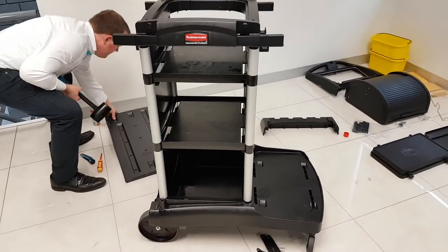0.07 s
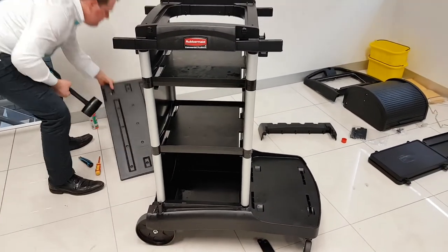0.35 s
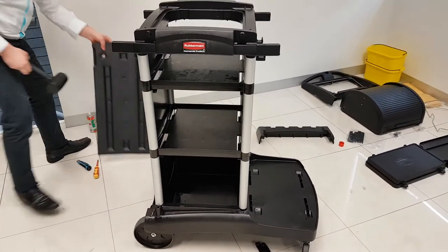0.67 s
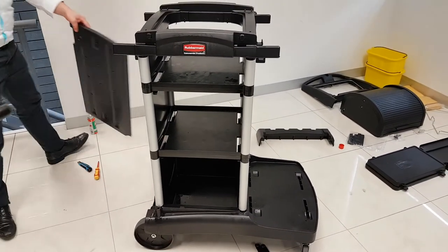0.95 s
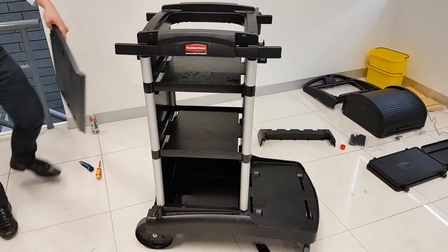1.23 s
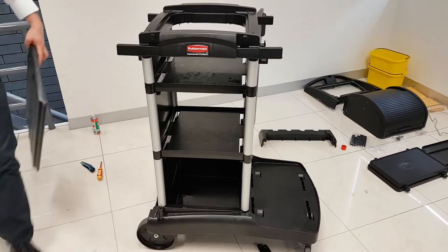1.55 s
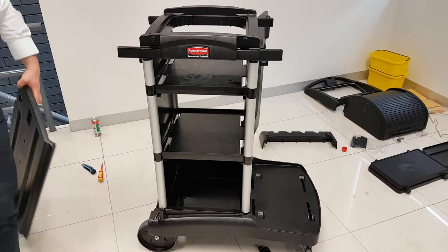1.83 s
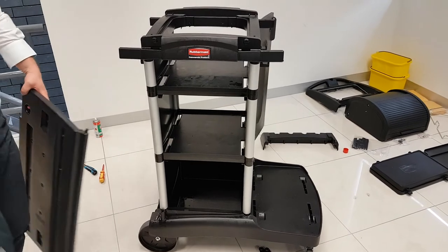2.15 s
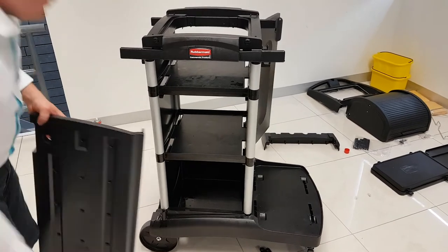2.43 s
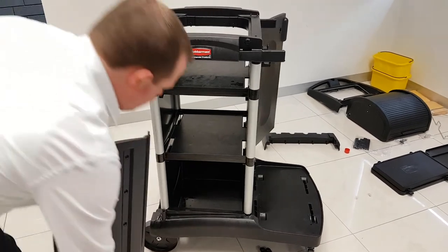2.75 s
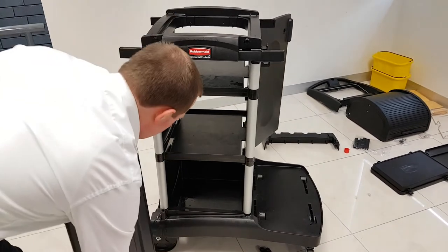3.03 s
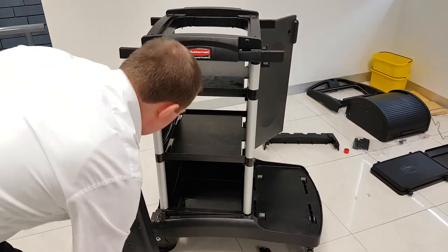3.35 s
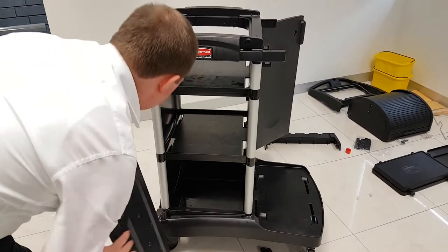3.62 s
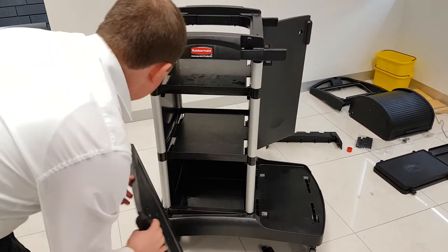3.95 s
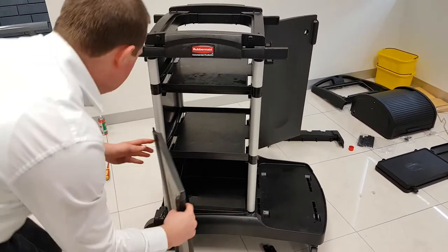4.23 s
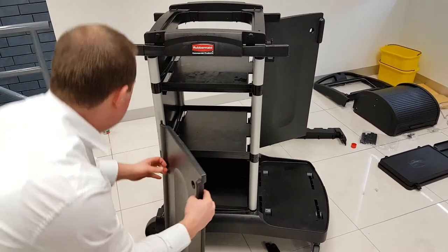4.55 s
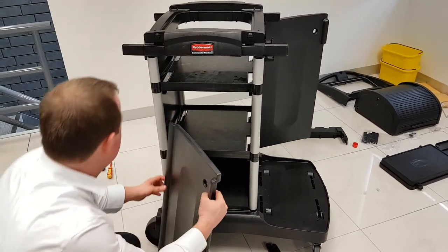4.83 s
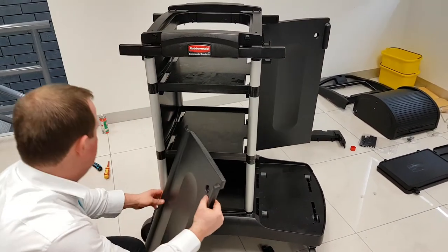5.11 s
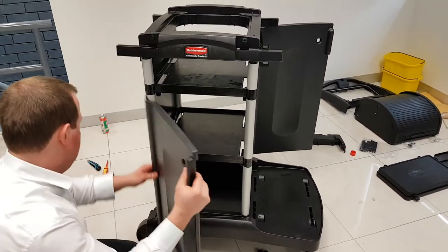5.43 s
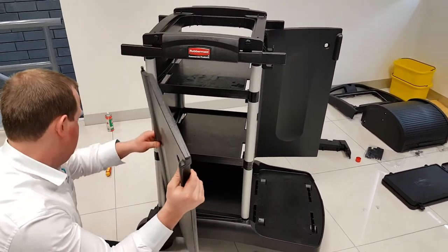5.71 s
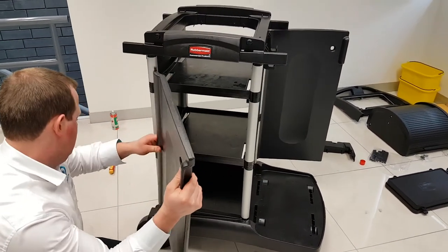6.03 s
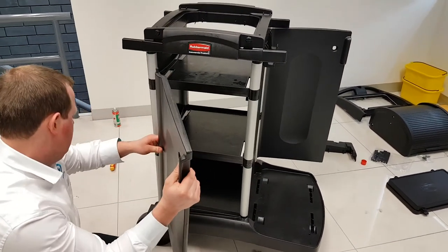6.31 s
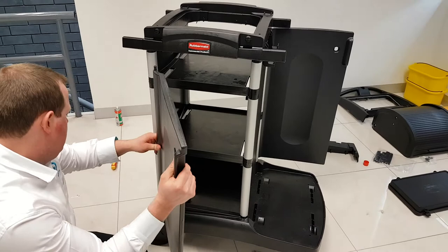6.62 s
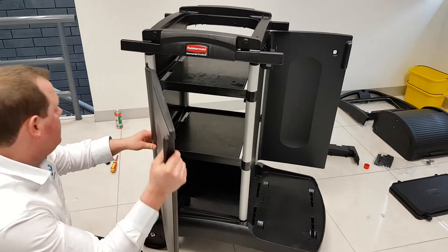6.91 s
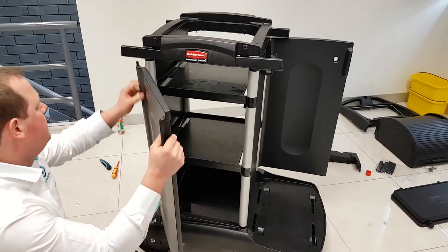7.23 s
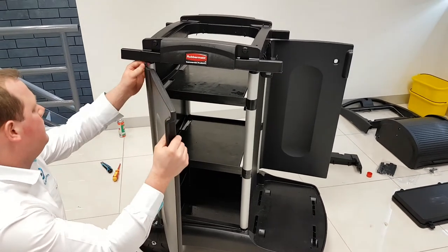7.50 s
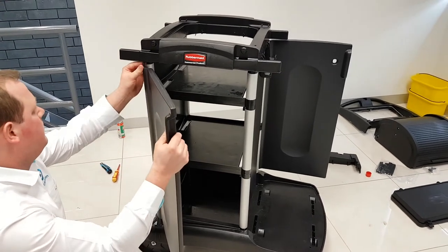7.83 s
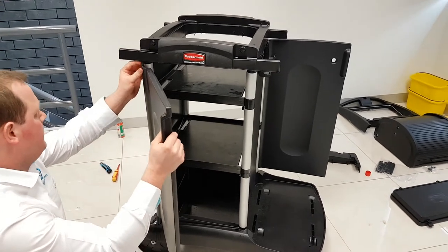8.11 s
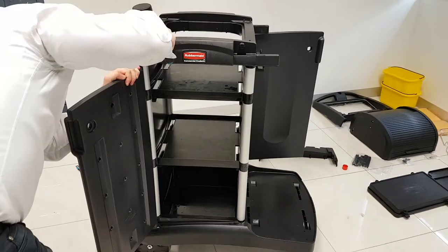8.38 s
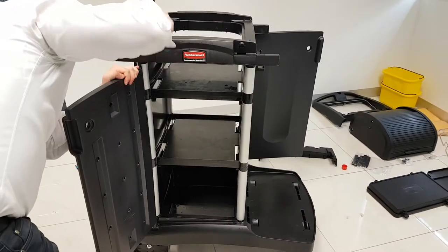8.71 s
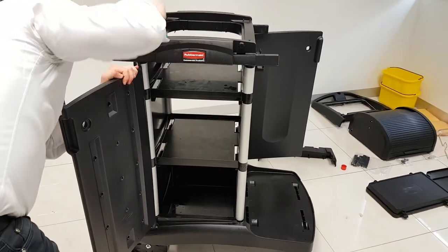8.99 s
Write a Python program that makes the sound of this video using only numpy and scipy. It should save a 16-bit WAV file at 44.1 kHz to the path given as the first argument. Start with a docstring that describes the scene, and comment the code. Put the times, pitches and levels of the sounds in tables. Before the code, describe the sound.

A plastic panel bumps on tiles, then knocks and booms against a hollow plastic cart, with a few footsteps in a bare room.

```python
"""A man lifts a plastic door panel off a tiled floor; it bumps, flexes and rings.
From 1 s his shoes tap and light clicks sound as he carries it round a plastic cart.
From 2.7 to 6.8 s he works it onto its hinge; it knocks on the hollow cart, which clacks and booms.
His hand slides up the door after 7 s; a shoe shifts on the tiles with a soft tap; a faint tick follows.
Throughout, the bare room answers briefly, ventilation hums and his shirt rustles faintly."""
import sys
import numpy as np
from scipy.fft import rfft, irfft, next_fast_len
from scipy.io import wavfile

SR = 44100
rng = np.random.default_rng(int(sys.argv[2]) if len(sys.argv) > 2 else 0)


def wrap_up_sound(samples):
    """Save the sound to the file named by the first command line argument, as 16-bit audio."""
    columns = np.atleast_2d(samples).T
    # keep every value between -1 and 1, then stretch to whole-number steps
    tamed = np.clip(columns, -1, 1)
    steps = np.round(tamed * 32767).astype(np.int16)
    wavfile.write(sys.argv[1], SR, steps)


N = 403515

# Three light clicks while the panel is carried, then door knocks on the cart. Each row: start in seconds,
# level in dB, contact time in ms, click in dB, bass weight in dB, frame ring in dB.
CLICKS_AND_KNOCKS = [(1.071, -53, 0.28, -6.5, -9, -1), (1.629, -64, 1.1, -1.5, 10, -2),
                     (1.925, -41.5, 0.24, -4.5, -1, -24), (2.744, -50.5, 1.25, -32, -10, -14),
                     (2.819, -43, 0.86, -15.5, -6, -14), (2.877, -27, 0.77, -21, 1, 9.5),
                     (2.912, -40, 0.64, -33, 5, 15.5), (2.955, -35.5, .95, -38, -1, 12),
                     (3.264, -41.5, 1.4, -24.5, 12, -9), (3.859, -24.5, 0.67, -21.5, 0.5, 10.5),
                     (4.013, -26.5, 1.42, -32, -6.5, -12), (4.411, -37, 0.94, -30, -9, 1),
                     (4.526, -45, 0.78, -21, -8, 0), (4.565, -27, 1.01, -34, -13, -7.5),
                     (4.851, -31, 0.89, -36, 4, 6.5), (4.979, -43, 1.15, -31, 1, -9),
                     (5.392, -26.5, 2.28, -59, -11, -11), (5.524, -24, 0.78, -38, -13.5, -20),
                     (5.612, -32.5, 0.93, -43, -11.5, -20), (5.656, -35.5, 1.4, -45, -17, -22),
                     (5.773, -22.5, 0.93, -24, -18.5, -9.5), (5.792, -26.5, 2.3, -36, -24, -15),
                     (5.859, -48, 1.4, -21, -13, -15), (6.756, -35, 0.94, -31, -12.5, -18),
                     (6.8, -38.5, 0.95, -19.5, -16, -22)]
# Cart frame. Each row: frequency in Hz, level in dB, t60 in seconds.
FRAME_MODES = [(63.6, -12, 0.68), (97, -17, 0.08), (147.8, 0, 0.31), (213.7, 1.5, 0.43), (274.7, -1, 0.45),
               (348.8, 0, 0.21), (381, -14, 0.52), (457, -11.5, 0.49), (642, -16, 0.39), (689, -13.5, 0.43),
               (904, -23, 0.15), (1014, -4, 0.16), (1320, -39, 0.16)]
# Panel on floor. Each row: start in seconds, level in dB, contact time in ms, click in dB, flex in dB.
PANEL_BUMPS = [(0.159, -34, 0.39, -7.5, 17.5), (0.166, -28.5, 0.51, -15.5, 9),
               (0.318, -36, 0.45, -34, 12.5), (0.352, -34, 0.8, -43, 6.5), (0.408, -34, 0.75, -34, 3.5),
               (0.473, -32.5, 0.69, -38, -4), (0.521, -29.5, 1, -30, -9.5)]
# Loose panel. Each row: frequency in Hz, level in dB, t60 in seconds.
PANEL_MODES = [(168, -21, 0.22), (218, -29, 0.21), (282, -6, 0.29), (355.3, 0, 0.29), (400.3, 4, 0.25),
               (468, -9, 0.35), (537, -5.5, 0.31), (830, -14.5, 0.26), (915, -13.5, 0.29)]
# Plastic ribs and walls. Each row: centre in Hz, width in Hz, gain in dB.
PLASTIC_PEAKS = [(346, 13, 4.5), (445, 110, -1.5), (571, 30, 0), (681, 12, -4), (873, 51, 3),
                 (1370, 54, -0.5), (2000, 63, 2.5), (2780, 41, 4.5), (5900, 290, -1), (6590, 1300, 6),
                 (7760, 900, 6.5)]
# Three steps, then a shoe shifting on tile. Each row: start in seconds, level in dB, contact time in ms.
SHOE_TAPS = [(0.973, -37.5, 1.47), (1.828, -35, 2.4), (2.483, -37.5, 2.1), (7.995, -49, 1.3)]
# Palm on plastic. Each row: frequency in Hz, gain in dB.
PALM_COLOUR = [(300, -11), (1200, 3), (2800, -4.5), (4200, -16), (6300, -9), (7350, 4), (8000, -3),
               (9200, -9), (11800, 1), (13600, 3), (15800, -8)]
# One tick: start in seconds, level in dB.
FAINT_TICK = (8.407, -49.5)
# Shirt movement. Each row: time in seconds, relative level in dB.
SHIRT_MOTION = [(0.0, -74), (0.61, -63.5), (1.6, -70.5), (1.91, -62), (2.44, -68.5), (2.93, -62),
                (3.21, -70.5), (4.41, -64), (4.56, -61.5), (4.92, -63), (5.38, -68), (5.76, -68),
                (6.01, -75), (6.8, -80.5), (7.31, -68), (7.8, -74), (8.95, -75), (9.15, -70)]
# Shirt fabric. Each row: frequency in Hz, gain in dB.
SHIRT_COLOUR = [(300, 1), (1200, 3), (2800, -1.5), (4200, -8), (6000, -4), (7300, -2), (9200, -6.5),
                (11800, -0.5), (14000, -6.5), (15800, -8)]
# Ventilation air. Each row: frequency in Hz, gain in dB.
AIR_COLOUR = [(15, -59), (25, -18), (64, -10), (113, -20.5), (157, -3), (222, -10), (382, -16),
              (449, -23.5), (769, -28), (857, -30), (929, -30), (1930, -43), (3050, -44), (5370, -53),
              (15800, -77)]
# Duct resonances. Each row: centre in Hz, width in Hz, level in dB.
DUCT_PEAKS = [(63, 8.9, -57), (161.8, 12, -54.5), (199.2, 5.3, -58)]
# Colour shared by all contacts. Each row: frequency in Hz, gain in dB.
BLOW_COLOUR = [(60, -13), (120, 1), (400, -2), (1000, -2.55), (2400, -2), (7000, -3), (14000, -8.5)]
# How well the parts radiate. Each row: frequency in Hz, gain in dB.
RADIATION_GAIN = [(30, -17), (65, -20), (7500, -0.5), (9500, 1), (13000, 12.5)]
# First crack over the shell's ring. Each row: frequency in Hz, gain in dB.
CRACK_GAIN = [(100, -25), (500, 5), (1500, 11), (4000, 10), (10000, 7.5)]
# Decay of the shell's dense modes. Each row: frequency in Hz, t60 in seconds.
SHELL_DECAY = [(100, 0.14), (400, 0.28), (1200, 0.068), (3000, 0.11), (10000, 0.072)]
# Room under the direct sound. Each row: frequency in Hz, gain in dB.
ROOM_GAIN = [(100, -6), (400, -1.5), (1200, -8), (3000, -2), (10000, -7)]
# Room decay. Each row: frequency in Hz, t60 in seconds.
ROOM_DECAY = [(100, 0.65), (350, 0.46), (1000, 0.4), (2500, 0.43), (6000, 0.48), (12000, 0.2)]
# Stereo image. Each row: frequency in Hz, left-right correlation.
STEREO_LIKENESS = [(60, .98), (300, 0.94), (650, 0.45), (1400, 0), (3000, 0.013), (8000, 0)]


def clicks_and_cart(ring_db=1.5, swell_s=0.024, crack_db_per_ms=6, yield_db_per_db=0.29):
    """Light clicks, then door knocks: glancing ones clack on plastic, square ones boom in the frame."""
    out = np.zeros((2, N))
    for start_s, level_db, contact_ms, click_db, weight_db, frame_db in CLICKS_AND_KNOCKS:
        # A yielding frame softens the crack; a long contact damps the shell, so the crack stands out.
        crack_db = -2.5 - yield_db_per_db * frame_db + crack_db_per_ms * contact_ms
        clack = contact(contact_ms, click_db, weight_db, crack_db, PLASTIC_PEAKS)
        boom = amp(frame_db + ring_db) * ring(FRAME_MODES, swell_s)
        add(out, start_s, amp(level_db) * (clack + boom))
    return out


def panel(contact_db=-3, ring_db=5.0, swell_s=0.015):
    """An edge of the loose panel bumps on the tiles; the sheet flexes slowly and rings."""
    out = np.zeros((2, N))
    for start_s, level_db, contact_ms, click_db, flex_db in PANEL_BUMPS:
        edge = contact(contact_ms, click_db, weight_db=-10, crack_db=-6, peaks=PLASTIC_PEAKS)
        flex = contact(contact_ms=2.05, click_db=-55, weight_db=-23, crack_db=-9, peaks=PLASTIC_PEAKS)
        add(out, start_s, amp(level_db + contact_db) * (edge + amp(flex_db) * flex))
        add(out, start_s, amp(level_db + flex_db + ring_db) * ring(PANEL_MODES, swell_s))
    return out


def shoes(click_db=-27, weight_db=-5, crack_db=5, sole_delay_s=0.061, sole_db=-9, sole_ms=3.1):
    """A shoe taps the tiles as it steps or shifts; the sole settles, softer and duller."""
    out = np.zeros((2, N))
    for start_s, level_db, contact_ms in SHOE_TAPS:
        tap = contact(contact_ms, click_db, weight_db, crack_db)
        sole = contact(sole_ms, click_db, weight_db, crack_db)
        add(out, start_s, amp(level_db) * tap)
        add(out, start_s + sole_delay_s, amp(level_db + sole_db) * sole)
    return out


def hand(start_s=7.11, end_s=7.36, start_db=-59, growth_db_per_s=10, edge_db_per_s=300):
    """The palm runs up the door's edge, louder as it speeds up; it starts and stops quickly."""
    t = np.arange(N) / SR
    stroke_s = np.clip(t, start_s, end_s)
    level_db = start_db + growth_db_per_s * (stroke_s - start_s) - edge_db_per_s * np.abs(t - stroke_s)
    return rub(level_db, PALM_COLOUR, left_db=3, catch_db=0.8)


def tick():
    """A faint tick, mostly crack."""
    start_s, level_db = FAINT_TICK
    out = np.zeros((2, N))
    add(out, start_s, amp(level_db) * contact(contact_ms=1.53, click_db=-19, weight_db=0, crack_db=10))
    return out


def shirt(gain_db=7):
    """The shirt rustles as much as the man moves."""
    motion_db = np.interp(np.arange(N) / SR, *np.transpose(SHIRT_MOTION))
    return rub(motion_db + gain_db, SHIRT_COLOUR, left_db=1.0, catch_db=1.5)


def ventilation(air_db=-44.5):
    """Dull air noise with narrow duct resonances."""
    air = amp(air_db) * rush(lambda hz: amp(along(AIR_COLOUR, hz)))
    hum = sum(amp(db) * rush(lambda hz: peak(hz, centre_hz, width_hz))
              for centre_hz, width_hz, db in DUCT_PEAKS)
    return air + hum


def contact(contact_ms, click_db, weight_db, crack_db, peaks=(), size=24576):
    """One contact, octave by octave: a crack, the short ring of dense shell modes, then the room."""
    ripple_db, ripple_hz, crack_t60_s, swell_cycles = 2.5, 45, 0.0073, 0.95
    t = np.arange(size) / SR
    hz, spectrum = noise_spectrum(size)
    # Each point of impact favours its own set of modes.
    ripple = np.interp(hz / ripple_hz, np.arange(size), rng.standard_normal(size))
    colour_db = force_db(hz, contact_ms, click_db, weight_db) + ripple_db * ripple
    colour_db += along(RADIATION_GAIN, hz)
    colour_db += sum(db * peak(hz, centre_hz, width_hz) for centre_hz, width_hz, db in peaks)
    spectrum = spectrum * amp(colour_db) / np.sqrt(hz + 1)
    out = np.zeros((2, size))
    for centre_hz in 70 * 2 ** np.arange(8):
        distance_oct = np.minimum(np.abs(np.log2((hz + 1) / centre_hz)), 1)
        band = irfft(spectrum * np.cos(np.pi / 2 * distance_oct) ** 2, size)
        crack = amp(crack_db + along(CRACK_GAIN, centre_hz)) * fade(t, crack_t60_s)
        shell = fade(t, along(SHELL_DECAY, centre_hz))
        room = amp(along(ROOM_GAIN, centre_hz)) * fade(t, along(ROOM_DECAY, centre_hz))
        swell = 1 - np.exp(-t * centre_hz / swell_cycles)  # bending waves take time to spread
        band *= np.sqrt(crack ** 2 + shell ** 2 + room ** 2) * swell
        band_db = force_db(centre_hz, contact_ms, click_db, weight_db)
        out += amp(band_db) * band / np.std(band[:, :SR // 20])
    return out


def force_db(hz, contact_ms, click_db, weight_db, rolloff_order=4.69, bass_full_hz=118, bass_end_hz=366):
    """A blow falls off above 1 / contact time; weight sets the bass, a sharp edge adds a wide click."""
    cycles = hz * contact_ms / 1000
    bass = along([(bass_full_hz, 1), (bass_end_hz, 0)], hz)
    power = 1 / (1 + cycles ** rolloff_order) + amp(click_db) ** 2
    return weight_db * bass + along(BLOW_COLOUR, hz) + 10 * np.log10(power)


def ring(modes, swell_s, size=24576):
    """A struck part's modes swell and decay, at new phases for each blow."""
    t = np.arange(size) / SR
    out = np.zeros((2, size))
    for hz, db, t60_s in modes:
        _, phase, skew = rng.standard_normal(3)
        spread_rad = np.array([[1], [-1]]) * skew * stereo_angle(hz)
        out += amp(db) * fade(t, t60_s) * np.sin(2 * np.pi * hz * t + np.pi * phase + spread_rad)
    return out * (1 - np.exp(-t / swell_s))


def rub(level_db, colour, left_db, catch_db, catch_rate_hz=25):
    """Sliding friction: a hiss that follows the stroke and catches unevenly."""
    knots = rng.standard_normal(N // 100)
    catches = np.interp(np.arange(N) / SR * catch_rate_hz, np.arange(len(knots)), knots)
    hiss = rush(lambda hz: amp(along(colour, hz)))
    return amp(level_db + catch_db * catches) * hiss * amp([[left_db], [-left_db]])


def rush(gain_at):
    """Steady stereo noise of rms 1, shaped by gain_at(hz)."""
    size = next_fast_len(N)
    hz, spectrum = noise_spectrum(size)
    noise = irfft(spectrum * gain_at(hz), size)[:, :N]
    return noise / np.sqrt(np.mean(noise ** 2) + 1e-20)


def noise_spectrum(size):
    """Frequencies and spectrum of white stereo noise, alike in the bass, unrelated in the treble."""
    hz = np.fft.rfftfreq(size, 1 / SR)
    mid, side = rfft(rng.standard_normal((2, size)))
    angle_rad = stereo_angle(hz)
    return hz, np.cos(angle_rad) * mid + np.array([[1], [-1]]) * np.sin(angle_rad) * side


def stereo_angle(hz):
    """Mid-side angle in radians for the left-right likeness at hz."""
    return np.arccos(np.clip(along(STEREO_LIKENESS, hz), -1, 1)) / 2


def peak(hz, centre_hz, width_hz):
    """Resonance curve of height 1."""
    return 1 / (1 + (2 * (hz - centre_hz) / width_hz) ** 2)


def along(points, hz):
    """Read (Hz, value) points on a log axis."""
    points_hz, values = np.transpose(points)
    return np.interp(np.log(hz + 1), np.log(points_hz), values)


def fade(t, t60_s):
    """Exponential decay, 60 dB in t60_s."""
    return np.exp(-np.log(1000) * t / t60_s)


def amp(db):
    """Decibels to gain."""
    return 10 ** (np.asarray(db) / 20)


def add(track, start_s, sound):
    """Mix a sound in at start_s."""
    start = round(start_s * SR)
    track[:, start:start + sound.shape[1]] += sound[:, :N - start]


def scene(right_db=0.5):
    """Panel, clicks, cart, shoes and ventilation slightly right; shirt and hand left; tick centred."""
    right_side = (panel() + clicks_and_cart() + shoes() + ventilation()) * amp([[-right_db], [right_db]])
    return right_side + shirt() + hand() + tick()


def record(dry):
    """Brick-wall low-pass."""
    cutoff_hz = 15780
    size = next_fast_len(N + SR // 2)
    passband = np.fft.rfftfreq(size, 1 / SR) < cutoff_hz
    return irfft(rfft(dry, size) * passband, size)[:, :N]


dry = scene()
out = record(dry)
wrap_up_sound(out)
```